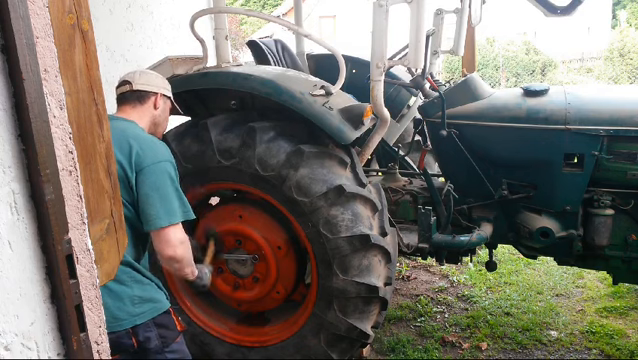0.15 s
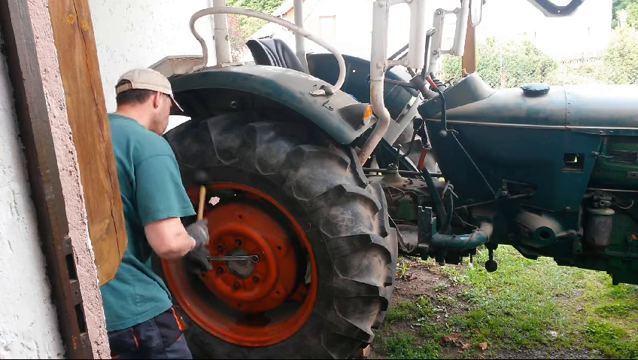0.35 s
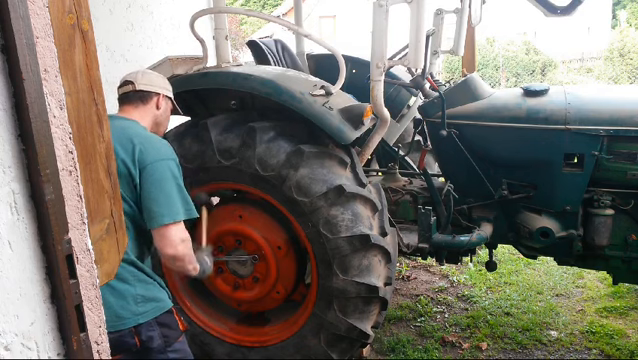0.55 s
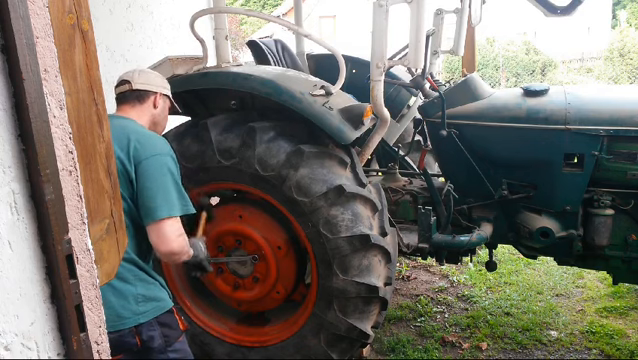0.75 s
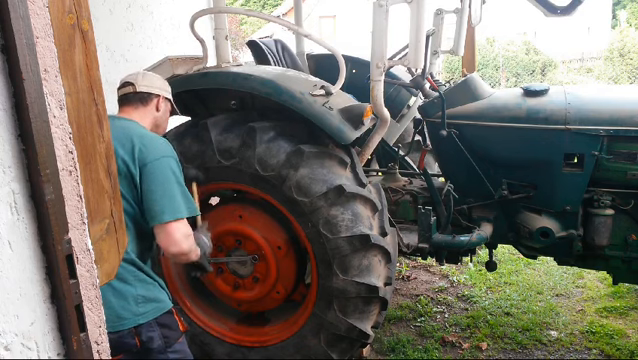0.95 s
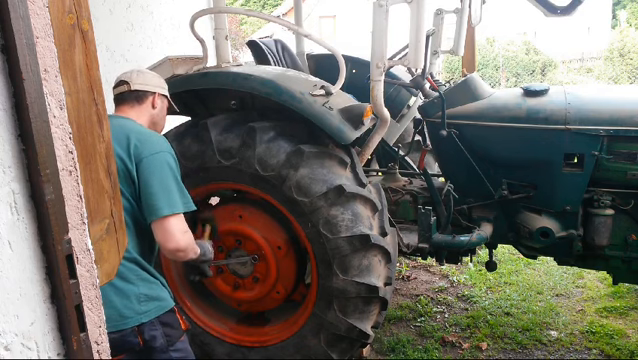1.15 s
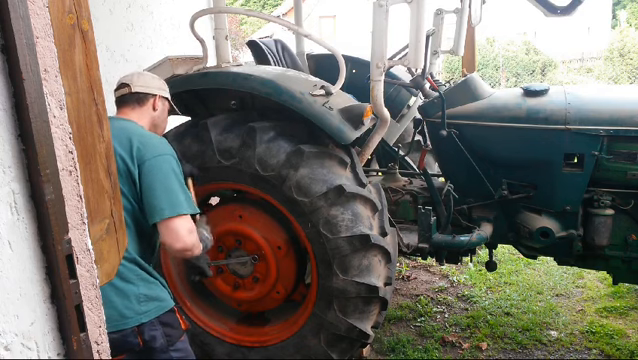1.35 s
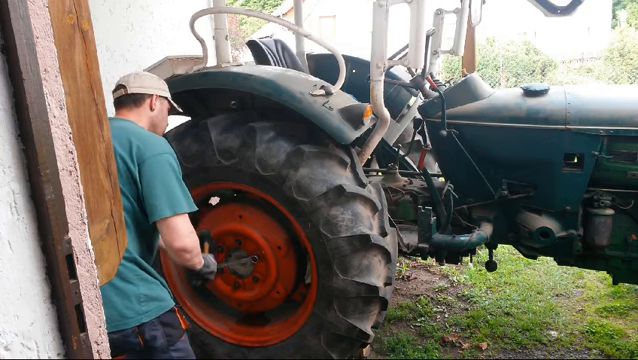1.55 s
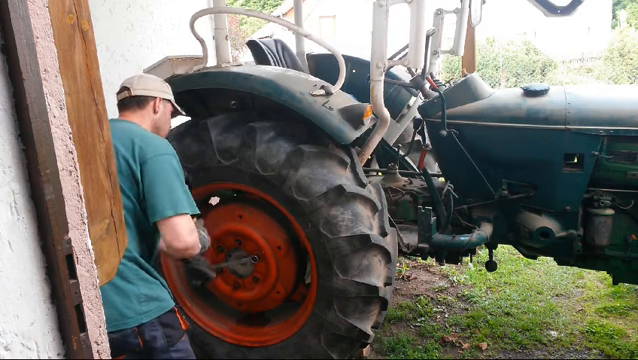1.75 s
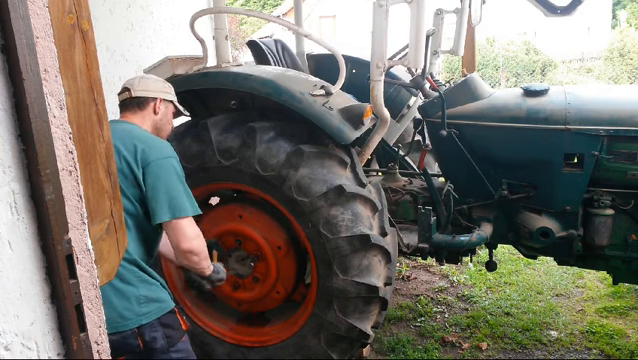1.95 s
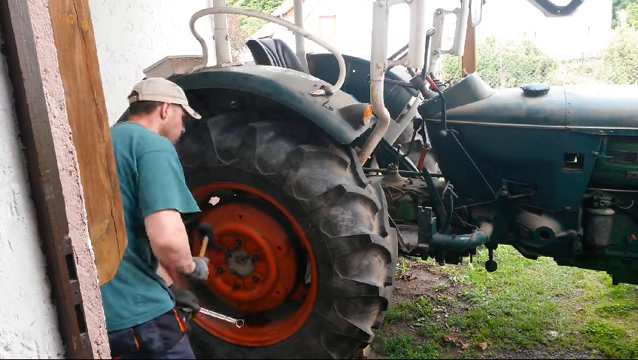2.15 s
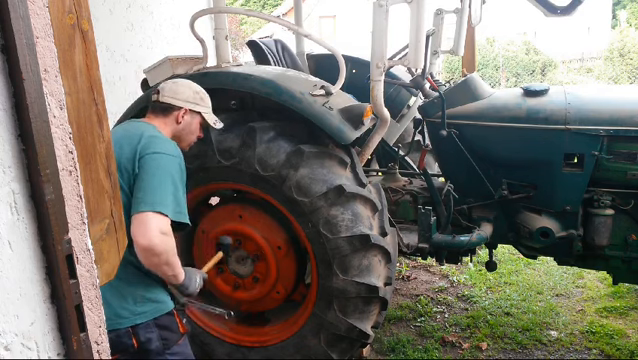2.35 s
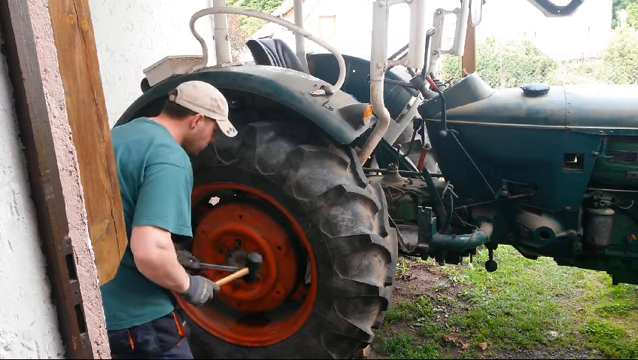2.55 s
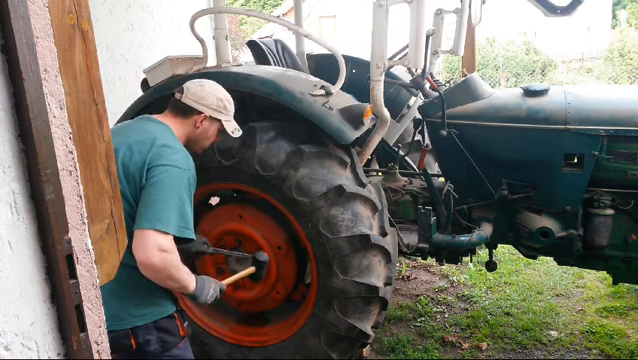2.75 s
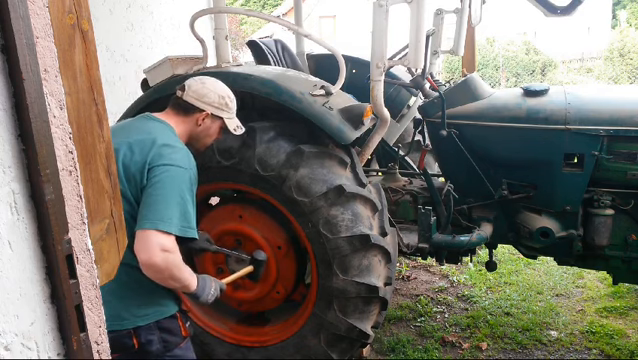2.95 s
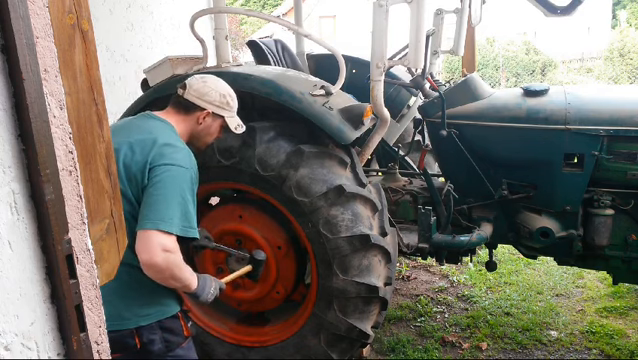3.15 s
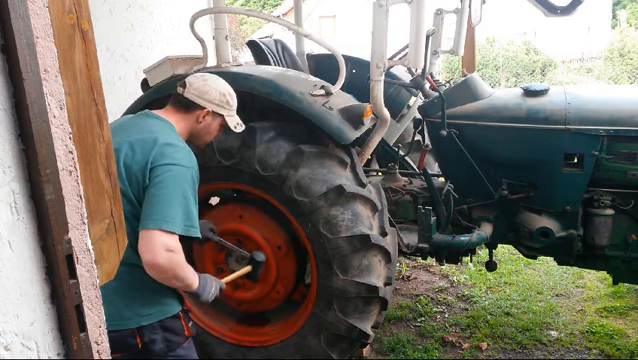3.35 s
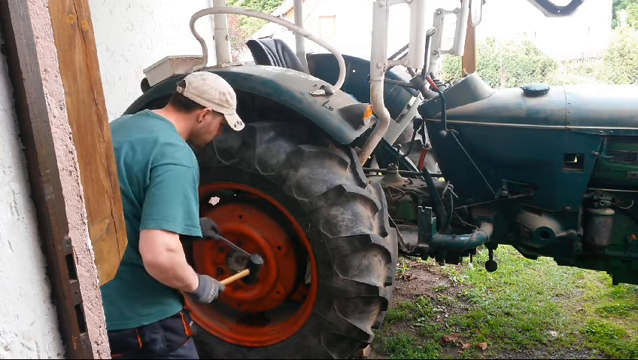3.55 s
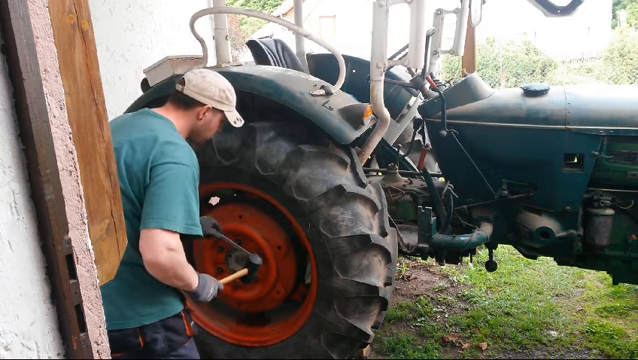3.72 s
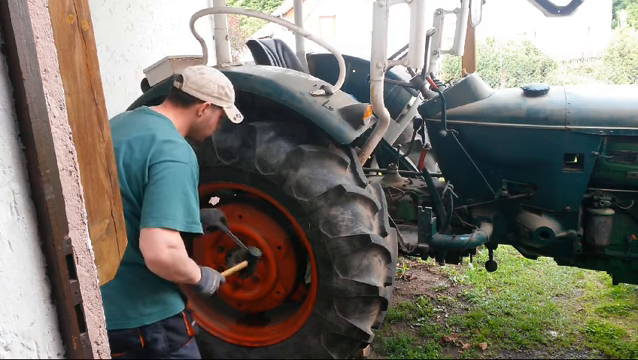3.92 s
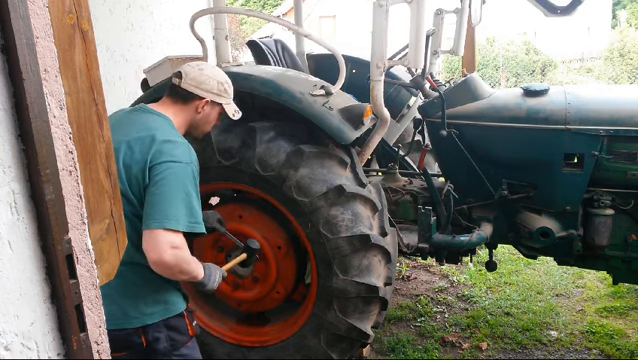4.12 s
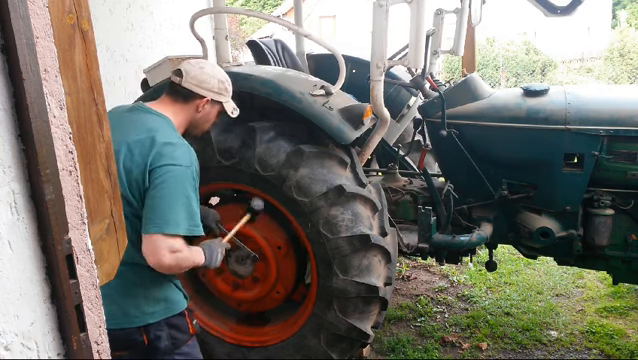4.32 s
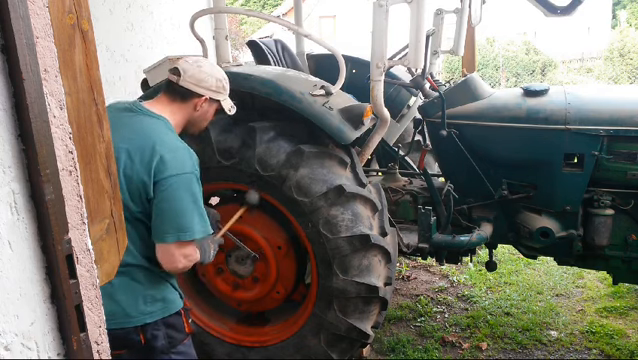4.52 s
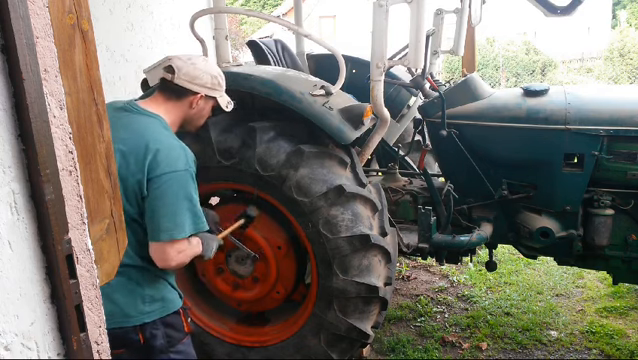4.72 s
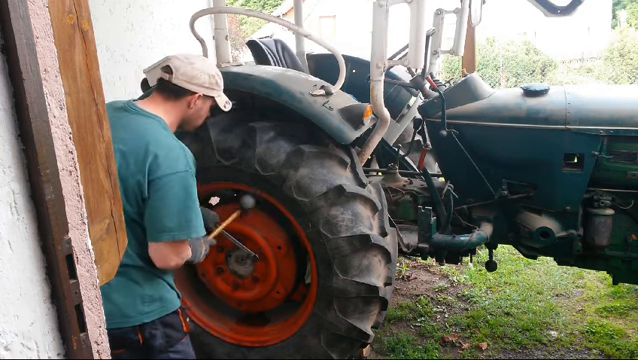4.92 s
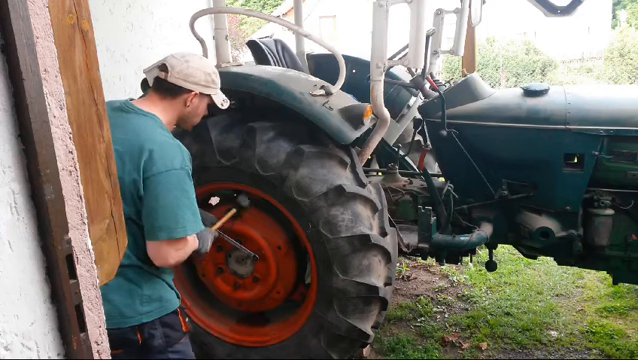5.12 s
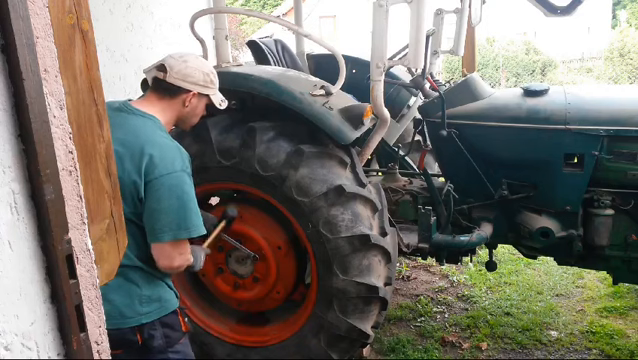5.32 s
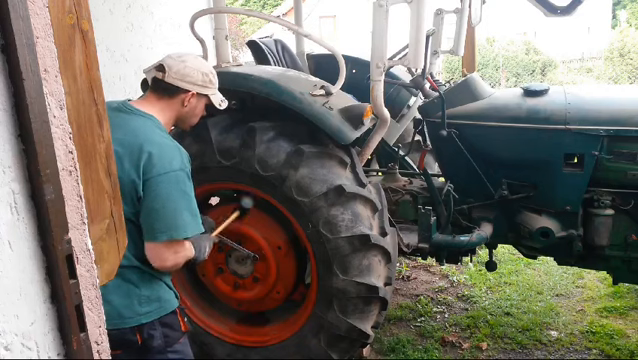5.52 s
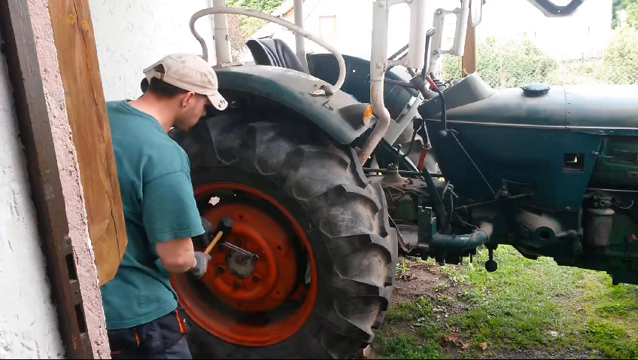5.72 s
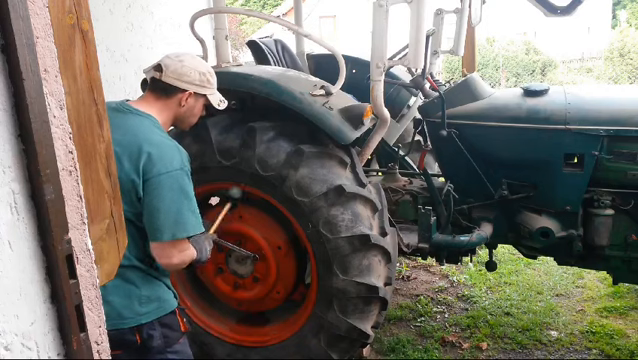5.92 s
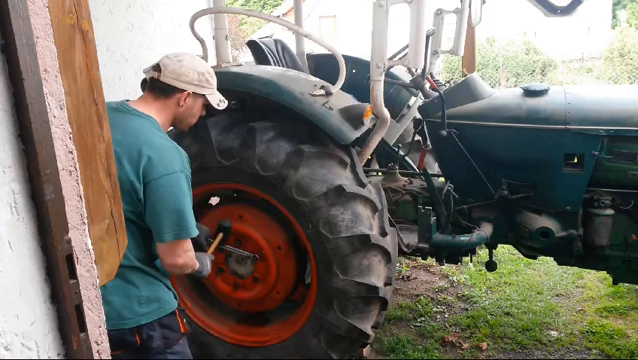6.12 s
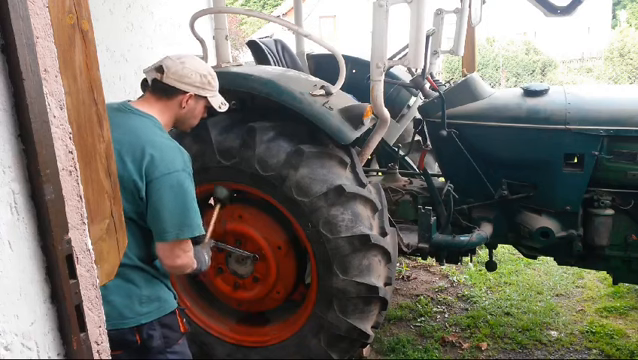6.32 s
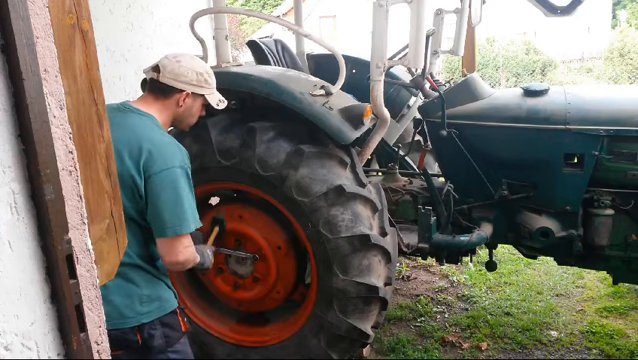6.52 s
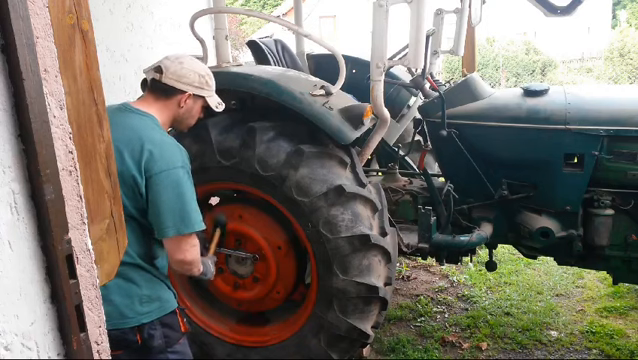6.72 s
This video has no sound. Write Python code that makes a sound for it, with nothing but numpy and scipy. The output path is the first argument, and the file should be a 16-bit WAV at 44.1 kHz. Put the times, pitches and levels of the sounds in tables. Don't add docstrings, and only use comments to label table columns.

```python
import sys
import numpy as np
from scipy import signal
from scipy.fft import rfft, irfft, next_fast_len
from scipy.io import wavfile
from scipy.ndimage import uniform_filter1d

SR = 44100
rng = np.random.default_rng(int(sys.argv[2]) if len(sys.argv) > 2 else 0)


def to_linear_factor(level_db):
    exponent = np.asarray(level_db, float) / 20
    return 10 ** exponent


def bounce(signal):
    frames = np.transpose(np.atleast_2d(signal))
    limited = np.clip(frames, -1, 1)
    pcm = np.round(limited * 32767).astype(np.int16)
    wavfile.write(sys.argv[1], SR, pcm)


N = 302960
LEAD = SR // 4

# [t/s, peak level/dB, thud/dB, sizzle/dB, f of the ring favoured by the landing spot/Hz]
FIRST_RUN = [
    (0.298, -7, -4.5, 1.5, 4520),
    (0.732, -7, 0.5, 0.5, 4700),
    (1.167, -6.5, -1.5, 1, 3200),
    (1.589, -8, 2.5, -2.5, 3250),
    (2.02, -8, 5, 1, 4620),
]
SECOND_RUN = [
    (4.713, -8, -2, 1.5, 2260),
    (5.098, -6.5, -3, 0.5, 3386),
    (5.469, -11, 1.1, -3.5, 3580),
    (5.839, -8.5, -1.2, 0.7, 3460),
    (6.197, -8.5, -4.9, 1.3, 2455),
    (6.527, -13, -0.5, 0, 2760),
]
EARLIER_BLOW_S, EARLIER_BLOW_DB = -.135, 1.5


def unit(x):
    return x / np.sqrt(np.mean(x ** 2))


def along(table, hz, column=1):
    table = np.array(table, float)
    return np.interp(np.log(np.maximum(hz, 1)), np.log(table[:, 0]), table[:, column])


def colour(x, table):
    size = next_fast_len(x.shape[-1], real=True)
    hz = np.fft.rfftfreq(size, 1 / SR)
    return irfft(rfft(x, size) * to_linear_factor(along(table, hz)), size)[..., :x.shape[-1]]


def swells(rows, rise_db, fall_db_per_s, rest_db, rest_fall_db_per_s):
    t = np.arange(N) / SR
    gain = 0
    for start_s, peak_s, peak_db in rows:
        after_s = np.maximum(t - peak_s, 0)
        to_go = np.clip((peak_s - t) / (peak_s - start_s), 0, 1)
        onset = np.clip((t - start_s) / 0.016, 0, 1)
        drop = to_linear_factor(-fall_db_per_s * after_s)
        linger = to_linear_factor(rest_db - rest_fall_db_per_s * after_s)
        gain = gain + to_linear_factor(peak_db - rise_db * to_go) * onset * np.maximum(drop, linger)
    return gain


def air():
    # [f/Hz, density/dB per Hz]
    air_spectrum = [(15, -48.5), (25, -16.5), (37, -14), (50, -11.5), (69, -1), (93, -16), (224, -18),
                    (318, -27.5), (394, -19), (1500, -31.5), (7090, -26), (9270, -32), (13800, -32.5),
                    (15000, -29)]
    lowpass = signal.ellip(8, .2, 70, 14550, fs=SR, output="sos")
    hiss = signal.sosfilt(lowpass, rng.standard_normal((2, N)))
    mid, side = colour(hiss, air_spectrum)
    side = colour(side, [(100, -13.5), (1000, 2.5), (6000, -1)])
    return unit(np.array([mid + side, mid - side])) * to_linear_factor(-66)


def shake():
    # [f/Hz, density/dB per Hz]
    shake_spectrum = [(20, -8), (40, 1), (90, -4.5), (160, -5.5), (300, -30), (1000, -70.5)]
    peak_delay_s, under_blow_db = .04, -50.5
    heavy = [(EARLIER_BLOW_S, FIRST_RUN[0][1]), *FIRST_RUN, *SECOND_RUN]
    rows = [(s, s + peak_delay_s, peak_db + under_blow_db) for s, peak_db, *_ in heavy]
    rumble = unit(colour(rng.standard_normal(N), shake_spectrum))
    return rumble * swells(rows, rise_db=13, fall_db_per_s=25.5, rest_db=-9.5, rest_fall_db_per_s=15.5)


def crack_noise(t, t60_s):
    push_hz = 239
    chatter = rfft(rng.standard_normal(len(t)) * 1000. ** (-t / t60_s))
    chatter = irfft(chatter / np.sqrt(uniform_filter1d(abs(chatter) ** 2, size=25)), len(t))
    chatter = rfft(chatter * 1000. ** (-t / (4 * t60_s)))
    push = np.sqrt(np.mean(abs(chatter) ** 2))
    bins_hz = np.fft.rfftfreq(len(t), 1 / SR)
    return irfft(np.where(bins_hz < push_hz, push, chatter), len(t))


def blows(rows, modes, crack, crack_db, crack_t60_s, ring_db, scatter_db, grip):
    colour_hz = [450, 1500, 4500, 7400]
    favour_db, favour_octaves, first_touch_s = 7.5, 0.093, .0027
    early = LEAD // 8
    out = np.zeros(N + 4 * LEAD)
    t = np.arange(2 * LEAD) / SR
    hz, db, t60_s = np.repeat(np.array(modes, float), 2, axis=0).T[:, :, None]
    hz = hz * (1 + .004 * rng.standard_normal(hz.shape))
    fade = 1000. ** (-t / (grip * t60_s))
    for s, peak_db, thud_db, sizzle_db, spot_hz in rows:
        strength, detune = rng.standard_normal((2, len(hz), 1))
        favour = favour_db * np.exp(-(np.log2(hz / spot_hz) / favour_octaves) ** 2)
        tones = np.sin(2 * np.pi * hz * (1 + 0.0039 * detune) * t)
        ring = (to_linear_factor(db + scatter_db * strength + favour) * tones * fade).sum(axis=0)
        snap = unit(colour(np.roll(crack_noise(t, crack_t60_s), early), crack)) * to_linear_factor(crack_db - 23.5)
        tilt = list(zip(colour_hz, [thud_db, 0, 0, sizzle_db]))
        blow = colour(snap + to_linear_factor(ring_db) * np.roll(ring, early), tilt)
        blow[:early] = 0
        at = int((s - first_touch_s) * SR) + LEAD - early
        out[at:at + len(t)] += to_linear_factor(peak_db) * blow
    return out


def first_run():
    # [f/Hz, level/dB, t60/s]
    wrench_low = [(955.0, -34.5, 0.72), (1205, -25.0, 0.32), (1879, -12, 0.35), (2116.0, -13.5, 0.037),
                  (2920.0, -2.5, 0.084), (3285, -5.5, 0.094), (3900, -13.5, 0.24), (3830, -17, 0.18),
                  (4047, -4.0, 0.088), (4510, -10.5, 0.18), (4810, -20, 0.43), (5135, -13.5, 0.31),
                  (5260, -7, 0.068), (6231, -14.5, 0.13), (6600, -27.5, 0.21), (6760, -11, 0.54),
                  (7130, -11.5, 0.47), (7240, -16.0, 0.38), (7730, -9.5, 0.18), (7780, -14.5, 0.044),
                  (7760, -21.5, 0.12), (8500, -14.0, 0.048), (156.3, -34.0, 1.0), (249, -23, 0.3),
                  (331.4, -31, 0.64), (438.0, -30, 0.96), (542, -24, 0.68), (630.0, -33, 0.6)]
    # [f/Hz, level/dB, t60/s]
    head = [(9200, -23.5, .3), (9830, -19.5, 0.32), (11250, -20.5, 0.38), (12130, -20.5, .4),
            (12530, -22.5, .35), (13100, -24, .3)]
    # [f/Hz, density/dB per Hz]
    crack_low = [(18, -49.5), (30, -26), (107, -26.5), (247, -7.5), (472, -6), (698, -3.5), (1030, -7.5),
                 (1200, -6.5), (1370, -11), (2130, 0.5), (2630, -10), (2990, 2.5), (8040, -11),
                 (15000, -47.5)]
    earlier = (EARLIER_BLOW_S, FIRST_RUN[0][1] + EARLIER_BLOW_DB, *FIRST_RUN[0][2:])
    return blows([earlier, *FIRST_RUN], [*wrench_low, *head], crack_low,
                 crack_db=-1.15, crack_t60_s=0.1968, ring_db=-15, scatter_db=2.5, grip=0.52)


def place():
    # [f/Hz, near t60/s, yard level/dB, yard t60/s, left-right likeness/0-1]
    echo_bands = [(59, 0.083, -13, 0.7, 0.4), (178, 0.28, -10.5, 1.34, 1), (540, 0.27, -20.5, 0.79, .75),
                  (1260, 0.25, -29.5, 0.97, 0.3), (2660, 0.19, -34, 0.81, 0.5), (4950, 0.22, -28, .8, 0.3),
                  (9400, 0.25, -35.5, 1, 0.4), (13907, 0.04, -29.5, 0.29, 0.19)]
    # [delay/s, level/dB]
    far_walls = [
        (0.114, -41.5),
        (0.236, -44),
        (.40, -45.5),
    ]
    build_ms, direct_db = 3.0, -12.0
    doorway_ms, doorway_spread_ms, doorway_db = 4.1, 4.0, 4
    t = np.arange(4 * LEAD) / SR
    t_ms = t * 1000
    hz = np.fft.rfftfreq(len(t), 1 / SR)
    shared, left, right = rfft(rng.standard_normal((3, len(t))))
    out = np.zeros((2, len(t)))
    slaps = sum(to_linear_factor(db) * np.exp(-((t - s) / 0.041) ** 2) for s, db in far_walls)
    doorway = to_linear_factor(doorway_db) * np.exp(-((t_ms - doorway_ms) / doorway_spread_ms) ** 2)
    build = (1 - np.exp(-(t_ms / build_ms) ** 2)) * (1 + doorway)
    for octave in np.arange(5, 14.1, .5):
        centre_hz = 2 ** octave
        band = np.cos(np.pi * np.clip(np.log2(hz + 1) - octave, -.5, .5)) ** 2
        near_s, yard_db, yard_s, like = (along(echo_bands, centre_hz, column=c) for c in range(1, 5))
        like = np.clip(like, 0, 1)
        mixed = np.sqrt(like) * shared + np.sqrt(1 - like) * np.array([left, right])
        ports = irfft(band * mixed, len(t))
        tail = 1000. ** (-t / near_s) + to_linear_factor(yard_db) * 1000. ** (-t / yard_s)
        fade = build * (tail + slaps / (1 + (centre_hz / 4500) ** 2))
        share = np.mean(ports ** 2) * np.sum(fade ** 2) / np.sum((ports * fade) ** 2, axis=1, keepdims=True)
        out += ports * fade * np.sqrt(share) * to_linear_factor(-27.0)
    out[:, 0] += to_linear_factor(direct_db)
    return out


def clink():
    # [t/s, peak level/dB, thud/dB, sizzle/dB, favoured f/Hz]
    knock = [
        (2.868, -25, 0.2, 0.2, 5130),
    ]
    # [f/Hz, level/dB, t60/s]
    wrench_loose = [(2380, -20.5, 0.34), (3110, -29.5, 0.056), (3650, -13, 0.213), (4040, -21, 0.128),
                    (4280, -9.5, 0.105), (5190, -8, 0.12), (5355, -8.5, 0.12), (5960, -17.5, 0.17),
                    (5860, -11, 0.12), (6870, -6.5, 0.194), (7860, 0.5, 0.12), (9060, -25, 0.1),
                    (10320, -36.5, 0.17), (10660, -34, 0.08)]
    # [f/Hz, density/dB per Hz]
    clink_crack = [(60, -34), (200, -10), (600, -18), (1000, -52), (1730, -9.5), (2400, -1), (3500, -2.5),
                   (4700, -17), (5300, 1.5), (8100, -8), (10500, -22), (14000, -45)]
    return blows(knock, wrench_loose, clink_crack,
                 crack_db=-3, crack_t60_s=0.18, ring_db=-11.5, scatter_db=2.0, grip=0.44)


def scrape():
    # [f/Hz, density/dB per Hz]
    slide_spectrum = [(220, -12), (700, -19.5), (1500, -21), (3500, -20), (5040, -20.5), (5130, 7),
                      (5230, -18), (7300, -11), (9500, -36), (13000, -45)]
    # [f/Hz, density/dB per Hz]
    drag_spectrum = [(150, -15.5), (250, -2), (285, -21), (439, -6.5), (908, -19.5), (1850, -13),
                     (2010, -11.5), (2450, -15.5), (4590, -20.5), (7290, -17.5), (13000, -47.5)]
    # [start t/s, peak t/s, peak level/dB]
    slide_swells = [
        (3.08, 3.158, -54.5),
    ]
    # [start t/s, peak t/s, peak level/dB]
    drag_swells = [
        (3.94, 4.05, -57.5),
        (4.07, 4.108, -36.5),
    ]
    clicks = rng.standard_normal(N) * to_linear_factor(2.5 * rng.exponential(size=N)) * (rng.random(N) < .2)
    slide = unit(colour(clicks, slide_spectrum))
    slide = slide * swells(slide_swells, rise_db=12, fall_db_per_s=1500, rest_db=-40, rest_fall_db_per_s=300)
    drag = unit(colour(clicks, drag_spectrum))
    drag = drag * swells(drag_swells, rise_db=11, fall_db_per_s=502, rest_db=-28.5, rest_fall_db_per_s=54.5)
    return slide + drag


def taps():
    # [t/s, peak level/dB, thud/dB, sizzle/dB, favoured f/Hz]
    seating = [
        (3.16, -39.5, 5, 11.5, 5200),
        (3.243, -42, 3, 0, 3400),
        (3.528, -41, 1.5, 6, 3400),
        (3.569, -48.5, 15, 0.5, 2015),
        (3.719, -27, -5, -4.5, 2010),
        (3.93, -41.5, 8, -2, 2000),
    ]
    # [f/Hz, level/dB, t60/s]
    wrench_seated = [(224, -11.5, 0.22), (594, -10.5, 0.19), (1804, -15.5, .15), (1865, -3, 0.12),
                     (2274, -11, 0.17), (2720, -12, 0.14), (3333, -5, 0.14), (3830, -12.5, .15),
                     (4100, -12, .15), (4200, -13, 0.17), (5230, -12.5, .15), (6433, -10, 0.13),
                     (7340, -4, .15)]
    # [f/Hz, density/dB per Hz]
    tap_crack = [(60, -45), (200, -15), (556, -4.5), (1000, -13), (1560, -20), (2000, -2), (3030, -9.5),
                 (3400, -2), (7220, -10.5), (10700, -52), (14000, -40)]
    return blows(seating, wrench_seated, tap_crack,
                 crack_db=-3.3, crack_t60_s=0.02, ring_db=-18, scatter_db=1.5, grip=0.8)


def wind():
    # [t/s, peak level/dB]
    pops = [(3.926, -31), (3.9344, -16.5), (3.953, -26), (3.9599, -26), (3.9665, -19), (3.9776, -26),
            (3.989, -36), (3.9924, -21), (4.002, -33), (4.0118, -9), (4.028, -32), (4.0385, -32.5),
            (4.068, -27), (4.229, -30.5), (4.2485, -41), (4.2801, -35.5), (4.306, -46), (4.5064, -32.5),
            (4.518, -35.5), (4.5581, -36), (4.5868, -29), (4.5989, -24), (4.608, -33.5), (4.6135, -36)]
    # [start t/s, peak t/s, peak level/dB]
    gusts = [
        (3.91, 4.02, -19),
        (4.2, 4.23, -38),
        (4.5, 4.62, -34),
        (4.7, 4.86, -43.5),
    ]
    pop_ms, pop_ms_per_db = .85, .09
    half = 2000
    t_ms = np.arange(-half, half) / SR * 1000
    pushes = np.zeros(N)
    for s, peak_db in pops:
        gust_db = min(gusts[::2], key=lambda g: abs(g[1] - s))[2]
        u = t_ms / (pop_ms + pop_ms_per_db * max(gust_db - 5 - peak_db, 0))
        at = int(s * SR) - half
        pushes[at:at + 2 * half] -= to_linear_factor(peak_db) * u * np.exp((1 - u ** 2 / np.where(u > 0, 1.7, .8)) / 2)
    pushes = signal.sosfilt(signal.butter(1, 45, "high", fs=SR, output="sos"), pushes)
    flutter_spectrum = [(20, -22), (60, 1.0), (120, -5.0), (300, -29), (1000, -61.0)]
    flutter = unit(colour(rng.standard_normal(N), flutter_spectrum)) * to_linear_factor(-1.5)
    return pushes + flutter * swells(gusts, rise_db=20, fall_db_per_s=547.5, rest_db=-16, rest_fall_db_per_s=153.5)


def second_run():
    # [f/Hz, level/dB, t60/s]
    wrench_high = [(153, -47.5, .6), (228, -48, 0.47), (255, -26, .25), (430, -44, 0.33), (572, -32, .3),
                   (857, -16, 0.27), (912, -16, 0.17), (1733, -18, 0.65), (2280, -14.5, .15),
                   (2300, -25.5, 0.17), (2723, -12.5, 0.28), (3228, -17.5, 0.073), (3386, -7.5, 0.18),
                   (3470, -8.5, 0.33), (3700, -6.5, 0.085), (3937.6, -18, 0.06), (4285, -8, .06),
                   (4500, -18, 0.083), (5316, -10.5, 0.26), (5440, -24.5, .12), (6840, -20, 0.1),
                   (7000, -10.5, 0.14), (7580, -19, 0.15), (8560, -27.5, 0.12)]
    # [f/Hz, density/dB per Hz]
    crack_high = [(20, -50.5), (60, -31), (130, -27.5), (247, -10), (400, -13), (900, -3), (1370, -18),
                  (1730, -7), (2770, -8.5), (3500, -6), (4500, -8.5), (8040, -15.5), (13900, -48.5),
                  (15000, -58)]
    return blows(SECOND_RUN, wrench_high, crack_high,
                 crack_db=-4, crack_t60_s=0.05, ring_db=-12.5, scatter_db=2.1, grip=0.36)


def microphone_ports(heard):
    # [f/Hz, left minus right level/dB]
    port_shading = [(60, 0), (110, 2.5), (200, 1.5), (380, 1), (700, -3.5), (1290, -1), (2380, -1.5),
                    (4400, 4), (8120, -3), (15000, -3.5)]
    heard = signal.sosfilt(signal.butter(2, 70, "high", fs=SR, output="sos"), heard)
    left = np.roll(colour(heard[0], [(f, db / 2) for f, db in port_shading]), 4)
    right = colour(heard[1], [(f, -db / 2) for f, db in port_shading])
    return left, right


def scene():
    tools = first_run() + clink() + taps() + second_run()
    tools[LEAD:LEAD + N] += scrape()
    heard = signal.fftconvolve(tools[None], place(), axes=1)[:, LEAD:LEAD + N]
    left, right = microphone_ports(heard)
    return np.array([left + wind(), right]) + air() + shake()


def low_pass(x):
    return signal.sosfilt(signal.butter(12, 15840, fs=SR, output="sos"), x)


def record(dry):
    top_hz, top_band_hz = 15050, 10100
    hush_db, hush_delay_s = -51.0, .012
    x = signal.sosfilt(signal.butter(2, 45, "high", fs=SR, output="sos"), dry)
    x = np.tanh(0.78 * x) / 0.81
    x = signal.sosfilt(signal.ellip(8, .2, 70, top_hz, fs=SR, output="sos"), x)
    top = signal.sosfiltfilt(signal.ellip(6, .1, 50, top_band_hz, "high", fs=SR, output="sos"), x)
    bright = signal.sosfilt(signal.butter(2, 1000, "high", fs=SR, output="sos"), x.mean(axis=0))
    loud = np.clip(uniform_filter1d(bright ** 2, size=512) / to_linear_factor(2 * hush_db) - 1, 0, 1)
    hushed = loud * np.roll(loud, int(hush_delay_s * SR))
    return low_pass(x - .97 * top * hushed)


dry = scene()
out = record(dry)
bounce(out)
```